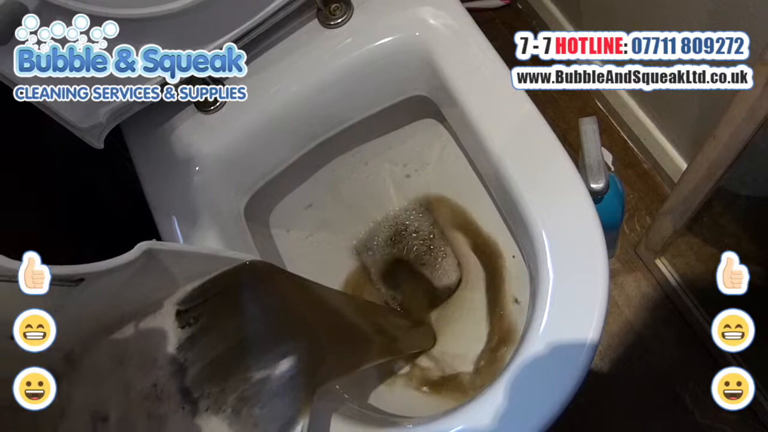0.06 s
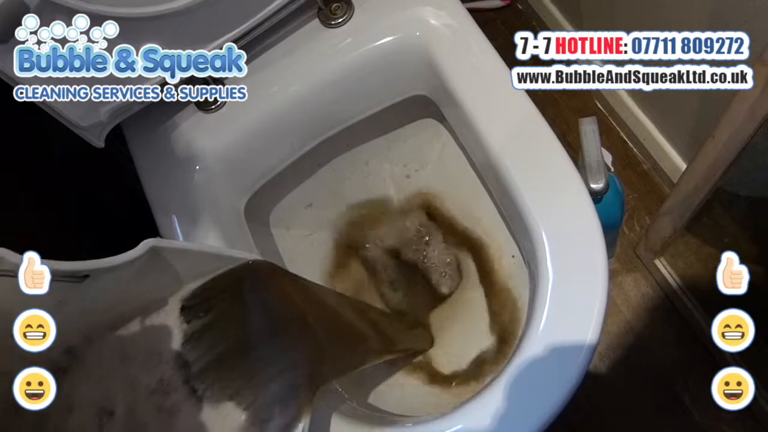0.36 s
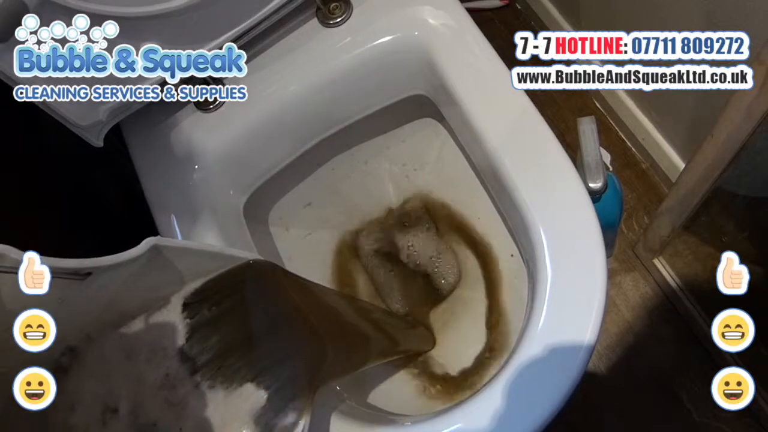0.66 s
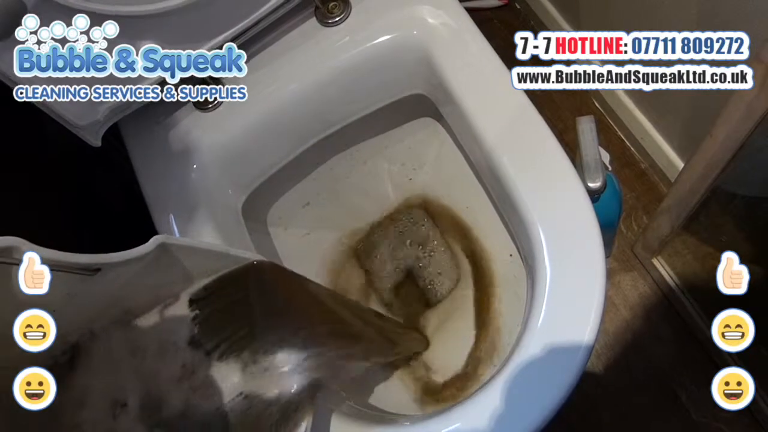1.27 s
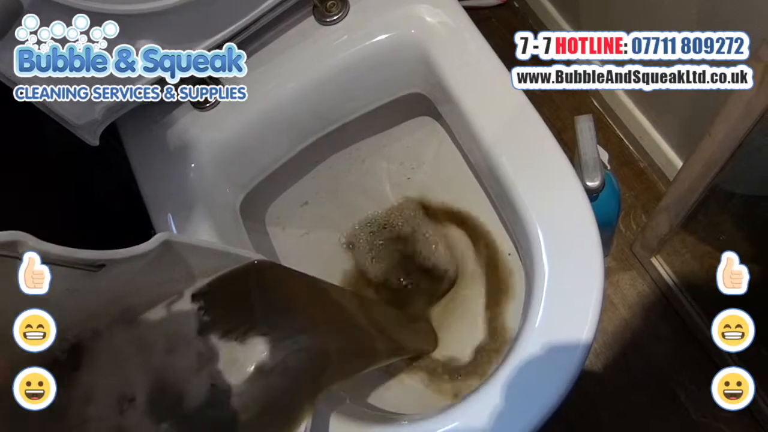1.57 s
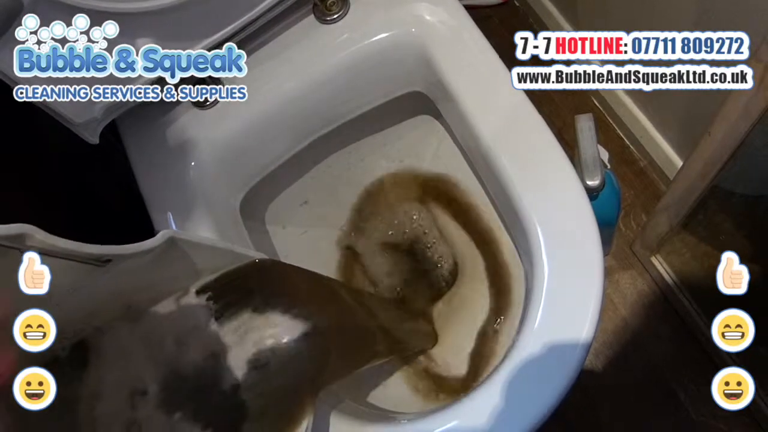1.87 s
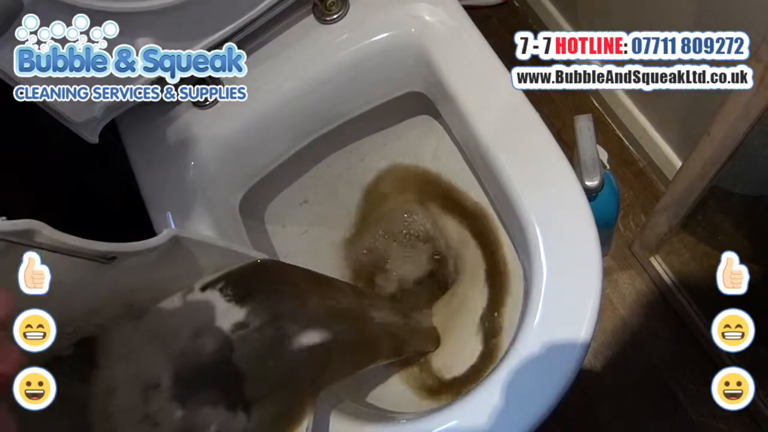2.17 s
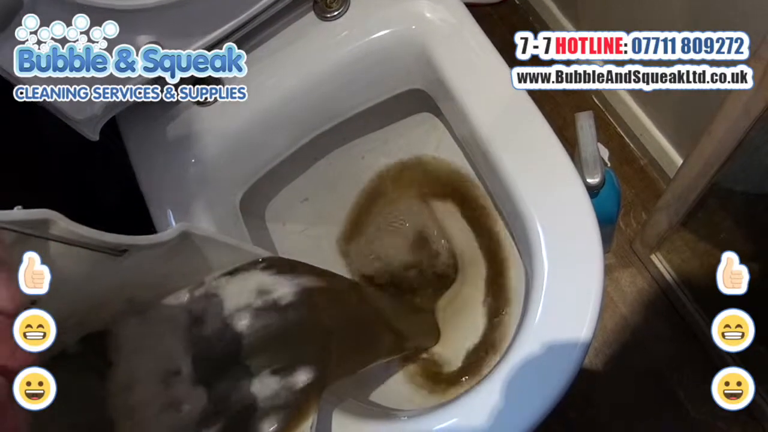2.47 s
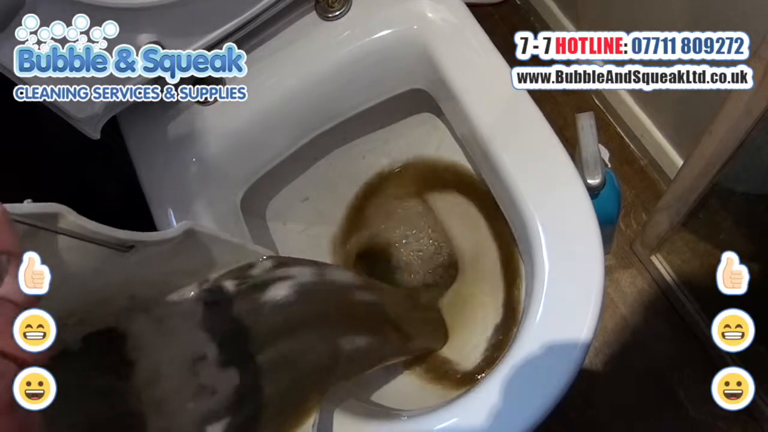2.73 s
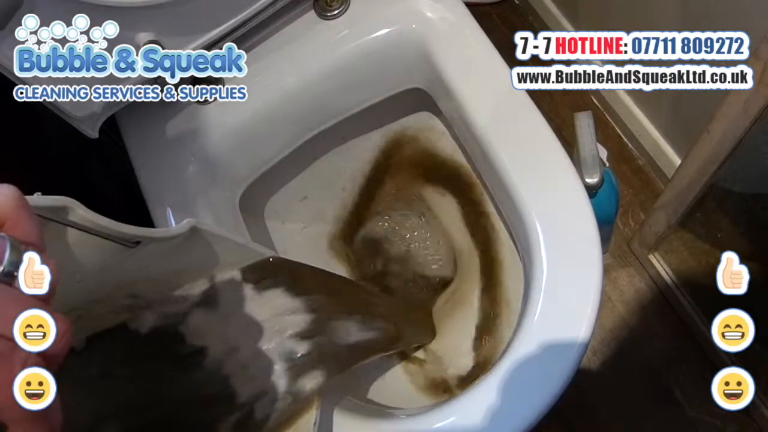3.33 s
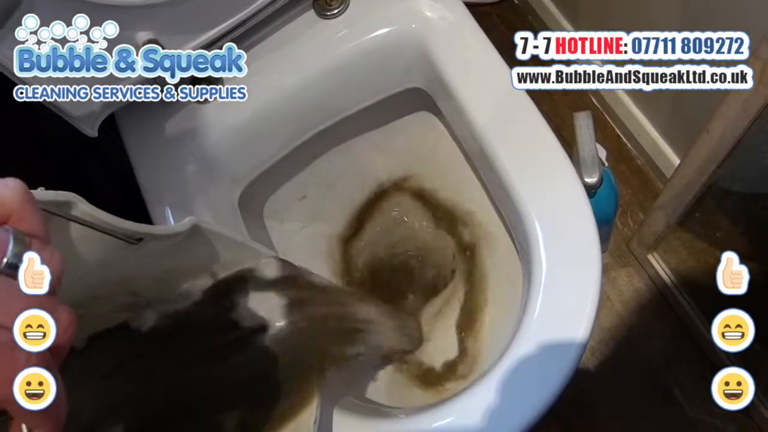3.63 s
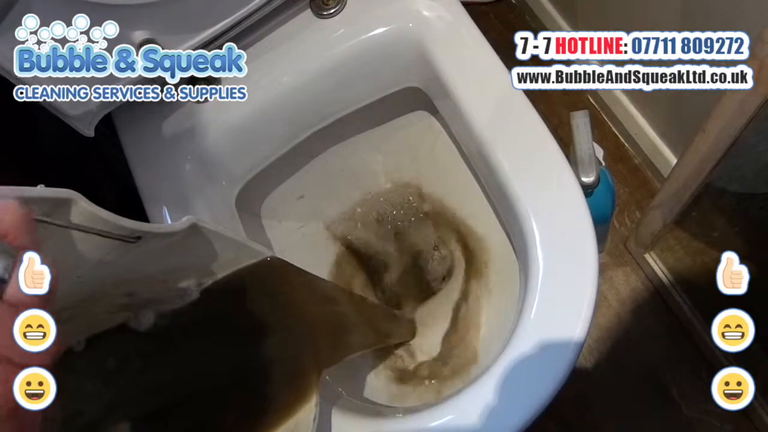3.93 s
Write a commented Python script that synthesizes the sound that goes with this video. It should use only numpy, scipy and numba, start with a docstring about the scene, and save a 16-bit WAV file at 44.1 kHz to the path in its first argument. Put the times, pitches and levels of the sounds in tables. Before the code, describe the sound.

Water pours heavily into a toilet bowl, splashing and gurgling without a break.

```python
"""A bucket of dirty water is emptied into a toilet bowl in a small bathroom, heard from just above.
It opens in full flow: the stream drags air under, and swarms of bubbles, from low churn through gurgle
to bright spray, set the hollow of the bowl ringing. Just before 1 s the sheet of water lands its hardest
slap on the porcelain. Big bubbles glug throughout, crowding in around 2 s, over deep gulps in the trap.
From 3 s the bucket knocks softly a few times while the pour runs on to the end."""
import sys
import numpy as np
from scipy import signal
from scipy.fft import rfft, irfft, next_fast_len
from scipy.io import wavfile
from numba import njit

SR = 44100
rng = np.random.default_rng(int(sys.argv[2]) if len(sys.argv) > 2 else 0)


def generate_wav(sig):
    """Save sig (samples, or channels by samples) to the path in sys.argv[1] as 16-bit PCM at SR."""
    pcm = np.round(np.clip(np.atleast_2d(sig).T, -1, 1) * 32767).astype(np.int16)
    wavfile.write(sys.argv[1], SR, pcm)


N = 176400
T = np.arange(N) / SR
SMALL_RISE, BIG_RISE = 0.15, 0.05   # share by which a bubble's pitch climbs as it dies


def from_db(db):
    """Decibels to gain."""
    return 10 ** (np.asarray(db) / 20)


def unit_rms(x):
    """Scale to rms 1."""
    return x / np.sqrt(np.mean(x ** 2) + 1e-20)


def fader_ride(points):
    """A level curve in dB about its own mean."""
    db = np.interp(T, *np.transpose(points))
    return db - db.mean()


def eq_at(points, hz):
    """Read an EQ curve in dB on a log-frequency axis."""
    f, db = np.transpose(points)
    return np.interp(np.log(hz + 1e-9), np.log(f), db)


def butter(x, hz, kind, order=2):
    """Butterworth filter."""
    sos = signal.butter(order, np.clip(hz, 10, .45 * SR), kind, fs=SR, output="sos")
    return signal.sosfilt(sos, x + 1e-18)


def drift(hz):
    """A smooth random modulator with rms 1, moving at rates up to about hz."""
    hop, run_in = 40, 2000
    r = np.exp(-2 * np.pi * hop * hz / SR)
    slow = signal.lfilter([1], [1, -2 * r, r * r], rng.standard_normal(N // hop + run_in + 2))[run_in:]
    return np.interp(np.arange(N) / hop, np.arange(len(slow)), unit_rms(slow))


@njit
def ring(onsets, gain, hz, t60, rise):
    """Each bubble or knock is a dying sine whose pitch climbs by the share `rise`."""
    out = np.zeros(N)
    for k in range(len(onsets)):
        start, length = int(onsets[k] * SR), int(t60[k] * SR) + 1
        height, loss, phase = gain[k], np.exp(-np.log(1000) / length), 0.
        for i in range(min(length, N - start)):
            out[start + i] += height * np.sin(phase)
            phase += 2 * np.pi * hz[k] / SR * (1 + rise * i / length)
            height *= loss
    return out


# soft knocks of the bucket: t/s, level/dB, f/Hz
BUCKET_KNOCKS = [(0.984, -49, 101), (3.009, -54, 144), (3.22, -55, 182), (3.471, -58, 144),
                 (3.885, -58, 130)]
def handling():
    """Faint, dull knocks of the bucket over a bed of low rumble."""
    t, db, hz = np.transpose(BUCKET_KNOCKS)
    knocks = ring(t, from_db(db), hz, t60=np.full(len(t), 0.1), rise=0.)
    rumble = unit_rms(butter(rng.standard_normal(N), 30, "low"))
    return butter(knocks, 300, "low") + from_db(-74) * rumble


# EQ of the reflections against the direct sound: f/Hz, level/dB
REVERB_EQ = [(280, -1.5), (480, 2.5), (750, 0.5), (1080, -9.5), (1500, -4.5), (2300, -3.5), (3500, -4.5),
             (6500, -5.5), (9000, 0), (13000, 3.5)]
def bathroom(x, send_db):
    """Two short reverb tails off porcelain and walls, different at each ear."""
    size = next_fast_len(N + SR // 2, True)
    hz = np.arange(size // 2 + 1) * SR / size
    echoes = 0
    for t60, db in ((0.15, 0), (0.097, 5)):
        decay = from_db(-60 * np.minimum(T / t60, 10)) * (T > .001)
        echoes = echoes + from_db(db) * unit_rms(rng.standard_normal((2, N)) * decay)
    echoes = unit_rms(echoes) / np.sqrt(N)
    wet = from_db(eq_at(REVERB_EQ, hz) + send_db)
    response = (1 + wet * rfft(echoes, size)) / np.sqrt(1 + wet ** 2)
    return irfft(rfft(x, size) * response, size)[:, :N]


# resonances of the hollow bowl: f/Hz, width/Hz, level/dB against the direct sound
BOWL_MODES = [(295.1, 14, 13.5), (354.6, 14, 4), (526, 18.6, 8.5), (583, 16, 9.5), (732.6, 12.2, 12.5),
              (889, 7.9, 7.5), (952, 14, 6), (1070.7, 57.3, 12), (1232, 13, 6), (1605, 16, 8),
              (1779, 23, 4), (2164, 62, 2), (2600, 73, 5), (3960, 37, -1), (4940, 330, -5.5)]
def bowl(x):
    """The air in the bowl rings along with the water; a steep low cut trims the bottom."""
    out = x.copy()
    for hz, width_hz, db in BOWL_MODES:
        r = np.exp(-np.pi * width_hz / SR)
        poles = [1, -2 * r * np.cos(2 * np.pi * hz / SR), r * r]
        out += from_db(db) * signal.lfilter([1, 0, -1], poles, x) * (1 - r * r) / 2
    return butter(out, 259, "high", order=8)


# dips in the low end: t/s, length/s, depth/dB
LOW_DIPS = [(.575, 0.037, 10), (.905, .05, 24), (1.315, 0.061, 63), (1.687, 0.032, 11), (1.87, 0.049, 2.9),
            (2.115, 0.049, 12), (2.33, .04, 24), (2.938, 0.045, 29)]
def lulls(x, below_hz=570):
    """The low end ducks briefly."""
    low = butter(x, below_hz, "low", order=4)
    low = butter(low[:, ::-1], below_hz, "low", order=4)[:, ::-1]   # backwards too, to stay in phase
    dip_db = sum(db * np.exp(-(2 * (T - t) / length) ** 2) for t, length, db in LOW_DIPS)
    return x - low * (1 - from_db(-dip_db))


def drops(per_s=110):
    """Stray drops tick on the porcelain, riding the level of the spray."""
    sizes = from_db(np.minimum(rng.exponential(1, N), 3.5)) * rng.choice([-1, 1], N)
    hits = rng.random(N) < per_s / SR
    ticks = butter(sizes * hits, [1900, 9000], "band", order=3)
    return from_db(-39.5 + fader_ride(SPRAY_RIDE)) * unit_rms(ticks)


# deep gulps in the trap: t/s, level/dB, f/Hz
TRAP_GULPS = [(.008, -39.5, 321), (0.366, -40.5, 537), (.722, -37, 418), (0.867, -39, 510),
              (1.04, -45.5, 293), (1.216, -47.5, 295), (1.528, -45, 454), (1.939, -43, 350),
              (2.052, -45, 536), (2.573, -36, 480), (2.672, -40.5, 446), (2.756, -40, 450),
              (3.029, -40.5, 526), (3.21, -39, 375), (3.372, -37.5, 410), (3.492, -37.5, 477),
              (3.586, -42.5, 275), (3.681, -38.5, 397)]
def gulps():
    """Large pockets of air dragged into the trap ring low and round."""
    t, db, hz = np.transpose(TRAP_GULPS)
    pockets = ring(t, from_db(db), hz, t60=np.full(len(t), 0.047), rise=BIG_RISE)
    return butter(pockets, 685, "low", order=4)


# slaps of water: t/s, relative level/dB, centre f/Hz, t60/s
WATER_SLAPS = [(0.018, -19.5, 5870, 0.17), (0.354, -18.5, 6000, 0.064), (0.536, -17, 4970, 0.035),
               (0.883, -18, 4780, 0.071), (.906, -7, 8900, 0.044), (.999, -12.5, 9800, 0.052),
               (1.232, -17, 6000, 0.034), (1.526, -15, 5260, 0.035), (1.639, -13.5, 7200, 0.073),
               (1.706, -16, 7300, 0.081), (1.81, -15, 6430, .025), (2.747, -21, 7700, .04),
               (2.942, -13.5, 7140, 0.037), (3.164, -14, 7160, 0.026), (3.335, -16, 5690, 0.033),
               (3.518, -11.5, 7600, 0.036), (3.674, -13, 6800, 0.044), (3.809, -17, 5300, 0.11)]
def slaps(attack_s=0.00036, crack_t60_s=.012):
    """The sheet of water hits the porcelain: a broadband crack and a short, grainy tail of droplets."""
    out = np.zeros(N)
    for t, db, hz, t60 in WATER_SLAPS:
        age = np.maximum(T - t, 0)
        grains = rng.standard_normal(N) * from_db(2.5 * drift(400))
        shower = unit_rms(butter(grains, [hz / 1.36, hz * 1.23], "band")) * from_db(-60 * age / t60)
        crack = rng.standard_normal(N) * from_db(-8 - 60 * age / crack_t60_s)
        out += (shower + crack) * np.minimum(age / attack_s, 1) * from_db(db - 7)
    return out


# glugs of big bubbles: t/s, relative level/dB, f/Hz
BIG_BUBBLES = [(0.0157, -12, 2410), (.054, -14, 2090), (.172, -19.5, 1090), (0.209, -23, 1095),
               (0.249, -20.5, 1080), (.334, -22, 1040), (.354, -11, 2170), (0.474, -23, 1083),
               (0.793, -18, 1204), (1.121, -14, 1880), (1.243, -11.5, 2060), (1.382, -23, 1077),
               (1.431, -20, 1175), (1.504, -11, 1980), (1.637, -17, 1090), (1.688, -19.5, 1096),
               (1.767, -12.5, 1895), (1.817, -16, 1040), (1.884, -7, 1820), (1.886, -22.5, 1130),
               (1.976, -19, 1220), (2.034, -13, 1105), (2.048, -11, 1900), (2.073, -15.5, 1047),
               (2.125, -17, 1106), (2.181, -14, 1100), (2.325, -17.5, 1122), (2.423, -19.5, 1105),
               (2.51, -10.5, 1860), (2.532, -20.5, 1092), (2.574, -15, 1063), (2.582, -11.5, 1660),
               (2.6, -11.5, 3900), (2.633, -8.5, 3930), (2.656, -9.5, 3950), (2.662, -11.5, 1740),
               (2.706, -11, 1835), (2.773, -11, 1820), (2.873, -16, 1083), (2.906, -12.5, 1626),
               (3.088, -23.5, 1124), (3.163, -10, 2350), (3.255, -18, 1136), (3.313, -25, 1070),
               (3.378, -20, 1060), (3.463, -15.5, 1160), (3.485, -11.5, 1123), (3.523, -19, 1100),
               (3.566, -8, 2113), (3.774, -16, 1100), (3.814, -12.5, 2350), (3.884, -20.5, 1065)]
def glugs(shed=10, scatter_s=.009, detune_octaves=0.4):
    """Each big pocket of air rings and sheds a quick cluster of smaller bubbles."""
    t, db, hz = np.transpose(BIG_BUBBLES)
    pockets = ring(t, from_db(db - 14.5), hz, t60=np.full(len(t), 0.052), rise=BIG_RISE)
    delay, detune = rng.standard_normal((len(t), 2, shed)).transpose(1, 2, 0)
    onsets = (t + scatter_s * np.abs(delay)).ravel()
    gains = np.tile(from_db(db - 20.5), shed)
    pitches = (hz * 2 ** (detune_octaves * np.clip(detune, -1, 2))).ravel()
    cluster = ring(onsets, gains, pitches, t60=np.full(delay.size, 0.017), rise=SMALL_RISE)
    return butter(pockets + cluster, 914, "high", order=4)


def surge(splashes_per_s=70, ebb_s=0.0018):
    """Movement of the stream in dB: slow wobble, fast flutter and a tiny dip at each small splash."""
    hits = (rng.random(N) < splashes_per_s / SR) * rng.uniform(0.17, 1, N)
    splashes = signal.lfilter([1], [1, -np.exp(-1 / (ebb_s * SR))], hits + 1e-18)
    return -1.42 * drift(hz=1.8) + 2.18 * drift(hz=55.3) - 0.5 * unit_rms(splashes - splashes.mean())


def swarm(low, high, per_s, cycles, spread_db, count=4000):
    """Bubbles born at random within one band; spread_db makes a few pop out of the texture."""
    wait, size, pitch, life, sign = rng.random((count, 5)).T
    onsets = np.cumsum(-np.log(1 - wait)) / per_s
    gain = from_db(spread_db * np.minimum(-np.log(1 - size), 4.2)) * np.sign(sign - .5)
    hz = low * (high / low) ** pitch
    t60 = cycles * 2 ** (2 * life - 1) / hz
    return unit_rms(ring(onsets, gain, hz, t60, SMALL_RISE))


# fader rides of the low churn, the gurgle in the pool and the spray: t/s, relative level/dB
CHURN_RIDE = [(0, -59), (.78, -54.5), (1.15, -59), (1.6, -54.5), (1.85, -64), (2.1, -54.5), (2.3, -58),
              (2.6, -57), (3.24, -54.5), (3.85, -59), (4, -55)]
GURGLE_RIDE = [(0, -39.5), (.55, -40.5), (.78, -37.5), (1.07, -41.5), (1.65, -36.5), (2.03, -36),
               (2.58, -36.5), (3.01, -37.5), (3.4, -36.5), (3.84, -40.5), (4, -40.5)]
SPRAY_RIDE = [(0.0, -24.5), (0.2, -27.5), (0.36, -26), (0.44, -29.5), (0.54, -27.5), (0.66, -28.5),
              (0.74, -25.5), (0.82, -26.5), (0.92, -25.5), (0.94, -28), (1.26, -25.5), (1.3, -23.5),
              (1.36, -29), (1.44, -26.5), (1.46, -32), (1.52, -26), (2.34, -26), (2.6, -26.5),
              (2.84, -26.5), (2.88, -26.5), (3.02, -28.5), (3.14, -29), (3.18, -25), (3.2, -30),
              (3.46, -26), (3.64, -28), (3.68, -27), (3.72, -28), (3.82, -28), (3.9, -29.5), (3.96, -25),
              (4.0, -31.0)]
# bubble textures: top f/Hz, rate per band/(1/s), decay/cycles, spread/dB, rush/dB, flicker/dB, surge share
CHURN = (797, 55, 11.5, 0.9, -13, 2.5, -0.35)
GURGLE = (2800, 150, 24, 0, -10, 1.24, 0.48)
SPRAY = (15000, 380, 52, 3.5, 1, 1.1, 0.76)
# tone colour of the pour, as spectral density: f/Hz, relative level/dB
POUR_EQ = [(230, -26), (290, -18.5), (410, -17.5), (530, -18), (680, -30.5), (850, -8.5), (1080, -9),
           (1400, -7), (1800, -3), (2400, -9), (3300, -3), (5200, -3.5), (7500, 1.54), (9500, -4.5),
           (11500, -4.5), (14000, -22)]
def pour(spots=3):
    """The stream drags air under: third-octave bubble swarms over a rush, one row per spot in the bowl."""
    surge_db = surge()
    heave_db = 3 * drift(hz=8.6)   # on the churn only
    edges = 224 * 2 ** (np.arange(19) / 3)
    white = rng.standard_normal((2, spots, N))
    out = np.zeros((spots, N))
    for k, (low, high) in enumerate(zip(edges, edges[1:])):
        hz = np.sqrt(low * high)
        texture, ride = ((CHURN, CHURN_RIDE) if hz < CHURN[0] else
                         (GURGLE, GURGLE_RIDE) if hz < GURGLE[0] else (SPRAY, SPRAY_RIDE))
        _, per_s, cycles, spread_db, rush_db, flicker_db, surge_share = texture
        rush = from_db(rush_db) * unit_rms(butter(white[k % 2], [low, high], "band"))
        bubbles = np.array([swarm(low, high, per_s / spots, cycles, spread_db) for _ in range(spots)])
        bubbles = butter(bubbles, 0.68 * low, "high", order=4)   # bubbles radiate little below pitch
        motion_db = surge_share * surge_db + flicker_db * drift(hz=11.5) + heave_db * (hz < CHURN[0])
        water = unit_rms((bubbles + rush) * from_db(motion_db))
        density_db = -65.5 + eq_at(POUR_EQ, hz) + fader_ride(ride)
        out += water * np.sqrt((high - low) / spots) * from_db(density_db)
    return out


def scene():
    """Each spot in the bowl gets its own reflections; glugs and slaps sit drier in the mix."""
    pool, wall, rim = pour()
    stems = ((pool + gulps(), 0), (wall, 0), (rim + drops(), 0), (glugs() + slaps(), -3.5))
    water = sum(bathroom(bowl(stem), send_db) for stem, send_db in stems)
    return lulls(water) + handling()


def record(dry):
    """The microphone softens the top, then a steep high cut closes it off."""
    softened = butter(dry, 10320, "low", order=3)
    return signal.sosfilt(signal.ellip(10, .2, 80, 15200, fs=SR, output="sos"), softened)


dry = scene()
out = record(dry)
generate_wav(out)
```